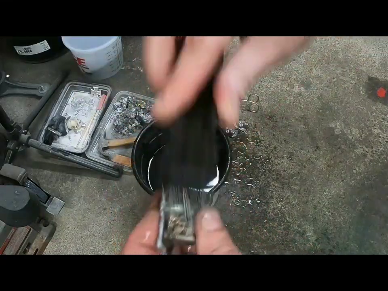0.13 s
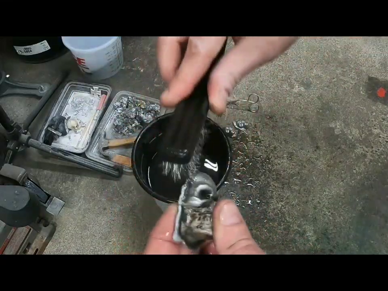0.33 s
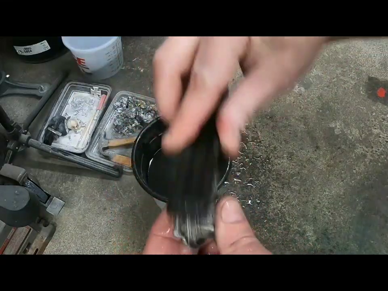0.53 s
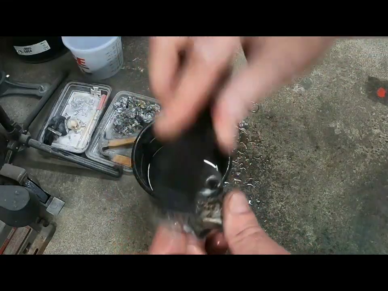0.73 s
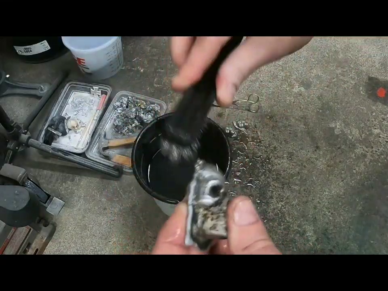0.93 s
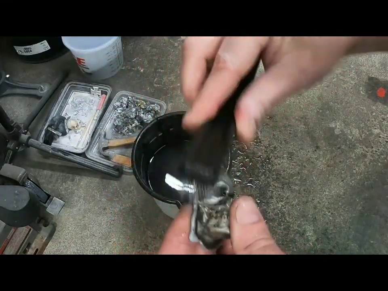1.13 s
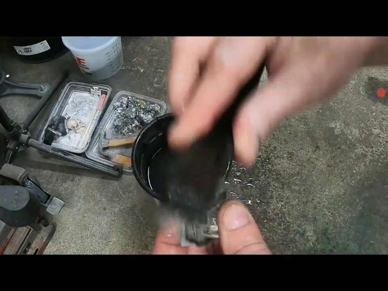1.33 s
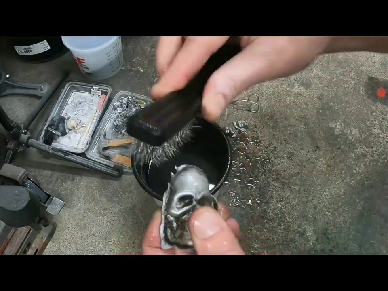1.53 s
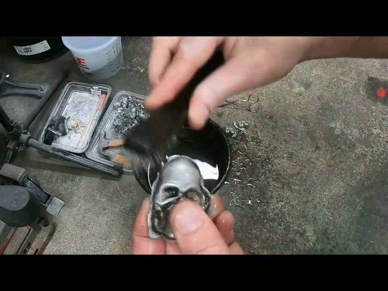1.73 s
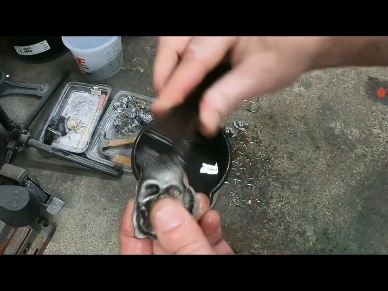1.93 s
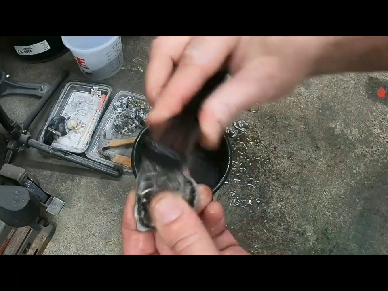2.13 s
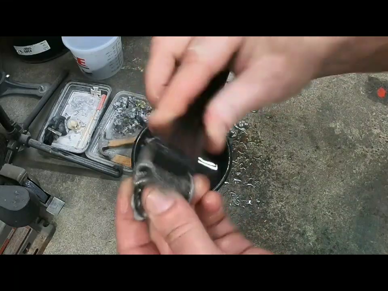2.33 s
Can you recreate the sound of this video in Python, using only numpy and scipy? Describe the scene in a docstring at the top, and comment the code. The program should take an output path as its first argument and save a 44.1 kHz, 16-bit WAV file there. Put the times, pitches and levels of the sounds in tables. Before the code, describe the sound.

A wire brush scrubs a small metal casting close to a stereo microphone. A sharp clack at 0 s, then raspy, bright scrapes near 0.23, 0.52, 0.82, 1.11, 1.39, 1.66, 1.91 and 2.15 s, with light tip touches and snagging ticks; a last touch at 2.37. Low handling thumps and uneven rumble run beneath, with a hollow boom around 2.0 s. Short workshop reverberation, faint air.

```python
"""Wire brush on a casting, close up

A hand wire brush scrubs a small metal casting in a workshop, about four strokes a second, close to the microphone.
After a sharp clack come the strokes: wire tips touch lightly, then countless snapping wires scrape and ring.
Wires, clack and air are filtered noise; handling adds sine thumps and booms over a noise rumble.
A short room tail follows brush and clack, and two microphone ports hear each source differently."""
import sys
import numpy as np
from scipy import signal
from scipy.fft import rfft, irfft, next_fast_len
from scipy.io import wavfile

SR = 44100
rng = np.random.default_rng(int(sys.argv[2]) if len(sys.argv) > 2 else 0)


def store_pcm(level_fs):
    """Save levels as 16-bit WAV."""
    pcm = np.round(np.clip(level_fs, -1, 1) * 32767).astype(np.int16)
    wavfile.write(sys.argv[1], SR, np.atleast_2d(pcm).T)


N = 104825


def amp(db):
    """Decibels to gain."""
    return 10 ** (np.asarray(db) / 20)


def unit(x):
    """Scales to an rms of one."""
    return x / np.sqrt(np.mean(x ** 2) + 1e-20)


def read(points, hz):
    """Reads a table by straight lines on a log-frequency axis."""
    f, value = np.transpose(points)
    return np.interp(np.log(hz + 1), np.log(f + 1), value)


def colour(x, points, size=4096):
    """Minimum-phase filter of unit energy, shaped by a table of relative levels."""
    log_gain = np.log(amp(read(points, abs(np.fft.fftfreq(size, 1 / SR)))))
    taps = np.fft.ifft(np.exp(np.conj(signal.hilbert(log_gain)))).real
    taps = taps / np.linalg.norm(taps)
    return signal.fftconvolve(x, taps[None], axes=1)[:, :N]


def wobble(hz):
    """Random wavering of unit rms, mostly slower than the given rate."""
    gain = 1 / (1 + (np.fft.rfftfreq(N, 1 / SR) / hz) ** 4)
    return unit(irfft(rfft(rng.standard_normal(N)) * gain, N))


def burst(t, fade):
    """Instant attack and exponential fade."""
    return (t >= 0) * np.exp(-np.maximum(t, 0) / fade)


def ports(pair):
    """Blends two versions of a sound into the likeness, level and phase of two microphone ports."""
    # left minus right: f/Hz, level/dB
    balance = [(30, -3.5), (70, -6), (160, -7.5), (330, -10), (500, -6.5), (700, -1.5), (1200, 1),
               (2000, 4), (2500, 7), (3200, -2), (4200, 3), (5600, 5.5), (7200, 7.5), (9800, 4.5),
               (11000, 1), (12300, 40), (15000, -10)]
    # phase by which left leads right: f/Hz, lead/rad
    lead = [(30, -0.28), (220, -0.29), (330, 2.6), (500, 3), (750, 3), (1200, 3), (1700, 5), (2900, 7),
            (4800, 6.5), (5600, 7.5), (9000, 8), (10300, 5.5)]
    # likeness of right to left: f/Hz, likeness (0 to 1)
    likeness = [(30, .99), (70, .98), (160, .5), (230, .6), (380, .9), (650, .9), (1200, .5), (2200, .8),
                (3000, .93), (5500, .95), (7000, .88), (9000, .7), (11000, .15), (15000, .1)]
    size = next_fast_len(N + 8192)
    hz = np.fft.rfftfreq(size, 1 / SR)
    a, b = rfft(pair, size)
    like = np.clip(read(likeness, hz), 0, 1)
    tilt = amp(read(balance, hz) / 2)
    right = (like * a + np.sqrt(1 - like ** 2) * b) * np.exp(-1j * read(lead, hz))
    mean_gain = np.sqrt((tilt ** 2 + tilt ** -2) / 2)
    return irfft(np.array([a * tilt, right / tilt]) / mean_gain, size)[:, :N]


def snaps():
    """Dense clicks of wire tips slipping free, bunched by fast chatter and by whole tufts catching."""
    snaps_per_s, spread_db = 7000, 3.5
    size_db = spread_db * np.minimum(rng.exponential(1, (2, N)), 4)
    size = amp(size_db) * rng.choice([-1, 1], (2, N))
    happens = rng.random((2, N)) < snaps_per_s / SR
    chatter_db = -1.97 * wobble(216)
    tuft_db = 1.1 * wobble(45)
    return unit(size * happens * amp(chatter_db + tuft_db))


def ring(x, count=36):
    """A random handful of wires, as decaying sines, rings on briefly after each snap."""
    t60_s, ring_gain = 0.043, 0.21
    t = np.arange(SR // 10) / SR
    hz = rng.uniform(3591, 12500, (count, 1))
    phase = rng.uniform(0, 2 * np.pi, (count, 1))
    tone = np.sin(2 * np.pi * hz * t + phase).sum(0) * np.exp(-np.log(1000) * t / t60_s)
    rung = signal.fftconvolve(x, tone[None] / np.linalg.norm(tone), axes=1)[:, :N]
    return (x + ring_gain * rung) / np.hypot(1, ring_gain)


def pressure(t, length, rise):
    """The brush bends onto the casting, stays, and slides off."""
    release_s = 0.019
    bend = np.sin(np.pi / 2 * np.clip(t / rise, 0, 1)) ** 2
    return bend * np.exp(-np.maximum(t - length, 0) / release_s)


def taps_of(events, rise_s, fade_s):
    """Sums short contacts, each a linear rise under an exponential fade."""
    t, force = np.arange(N) / SR, np.zeros(N)
    for start, db in events:
        age = t - start
        force += amp(db) * burst(age, fade_s) * np.clip(age / rise_s, 0, 1)
    return force


def brush():
    """Tips touch, the wires hiss and ring, tufts snag, and a rasp builds as the brush presses in."""
    # scrapes, one a faint graze on the way back: t/s, length/s, level/dB, rise/s,
    # level change over the stroke/dB, rasp level/dB, wire pitch ratio
    strokes = [(0.226, 0.15, -41.5, 0.074, -7.5, -50.5, 1.018),
               (0.518, 0.13, -39.5, 0.066, -5.5, -48, 1.022), (0.708, 0.14, -70, 0.03, 5, -87, 0.99),
               (0.82, 0.089, -38, 0.04, -4, -45, 1.023), (1.113, 0.099, -41.5, 0.031, -1.5, -49, 1.046),
               (1.386, 0.11, -38, 0.069, -13, -45.5, .99), (1.664, 0.082, -36.5, 0.047, -15, -43.5, 0.96),
               (1.912, 0.083, -39.5, 0.027, -6, -50, 0.986), (2.148, 0.084, -39, 0.04, -7, -48.5, 0.98)]
    # wire tips touch the casting: t/s, level/dB
    touches = [(0.2329, -42.5), (0.518, -44), (0.8086, -41), (1.108, -42), (1.394, -48), (1.658, -45),
               (1.901, -42.5), (1.911, -40.5), (2.141, -43), (2.367, -42.5)]
    # tufts snag on a ridge and spring free: t/s, level/dB
    snags = [(0.546, -32), (0.563, -30), (0.596, -31), (0.852, -38), (.904, -33), (1.228, -39.5),
             (1.437, -48), (1.492, -35.5), (1.696, -32), (1.704, -32), (1.746, -34), (2.004, -35),
             (2.17, -30.5)]
    # colour of the scraping wires before the pitch ratio: f/Hz, relative level/dB
    wire_colour = [(300, -15.5), (1500, -12), (3250, -15.5), (3550, -9.5), (3900, 0.5), (4400, -2),
                   (4950, -10.5), (5550, 4), (6300, 1.5), (7100, 3), (8300, -4), (10000, -13), (11200, -20),
                   (12300, -20.5), (13200, -25), (15000, -30)]
    # colour of the rasp: f/Hz, relative level/dB
    rasp_colour = [(100, 4), (300, -0.5), (400, 3), (490, 13.5), (570, -1.5), (780, 0), (1100, -11.5),
                   (1450, -12), (1800, -0.5), (2150, 0), (2520, 5), (2850, 0.5), (3050, -3), (3350, -1),
                   (4000, -13), (5000, -5), (8000, 3.5), (11000, -8), (15000, -17)]
    # colour of the tips and snags: f/Hz, relative level/dB
    tip_colour = [(300, -35), (2000, -18), (3300, -20.5), (3900, -9.5), (4400, -4.5), (4900, -11.5),
                  (5600, -3), (7200, -6), (8600, -15.5), (15000, -52)]
    rasp_lag_s = 0.022
    t, grit = np.arange(N) / SR, snaps()
    wires, press = np.zeros((2, N)), np.zeros(N)
    for start, length, db, rise, change_db, rasp_db, tune in strokes:
        age = t - start
        progress = np.clip((age - rise) / (length - rise), 0, 1)
        scrape = grit * pressure(age, length, rise) * amp(db + change_db * progress)
        wires += colour(ring(scrape), np.array(wire_colour) * [tune, 1])
        press += amp(rasp_db) * pressure(age - rasp_lag_s, length - rasp_lag_s, rise)
    touch = taps_of(touches, rise_s=0.0049, fade_s=0.0065)
    snag = taps_of(snags, rise_s=0.0017, fade_s=0.0027)
    rasp = colour(snaps() * press, rasp_colour)
    tips = colour(ring(snaps() * (touch + snag)), tip_colour)
    return ports(wires + rasp + tips)


def clack():
    """Noise bursts for a hard knock with a graze before and a bounce after, damped by the hand."""
    # brush against casting: t/s, level/dB, fade/s
    hits = [(.001, -27.5, 0.0083), (0.0099, -22.5, 0.0018), (0.0146, -38, 0.009)]
    # colour of the knock: f/Hz, relative level/dB
    knock_colour = [(100, -1.5), (450, -13), (700, -4), (850, 2), (1150, -6), (1400, -15.5), (1700, -3),
                    (2500, -4), (3100, -14.5), (3750, -4), (4800, -11), (5900, -3), (7400, -3),
                    (8500, -13.5), (10500, -23), (11500, -39), (15000, -39)]
    t = np.arange(N) / SR
    force = sum(amp(db) * burst(t - start, fade) for start, db, fade in hits)
    return ports(colour(rng.standard_normal((2, N)) * force, knock_colour))


def handling():
    """Soft sine thumps and hollow fading booms in an uneven low rumble of three noise bands."""
    # deep rumble before trim: t/s, level/dB
    deep = [(0, -48), (.3, -53), (.5, -43.5), (.69, -57), (.8, -41.5), (.97, -41), (1.08, -55), (1.4, -54),
            (1.55, -44), (1.85, -49.5), (2.0, -40.5), (2.12, -45), (2.38, -48)]
    # rumble above it before trim: t/s, middle level/dB, upper level/dB
    rumble = [(0.0, -50.5, -55.5), (0.21, -54, -68), (0.24, -47.5, -63), (0.48, -54, -68),
              (0.52, -51, -53.5), (0.67, -54, -58.5), (0.79, -41, -43.5), (0.99, -47, -50),
              (1.02, -52, -54.5), (1.21, -52.5, -51), (1.3, -53, -68), (1.5, -49, -53.5),
              (1.53, -47.5, -64), (1.57, -54, -56), (1.63, -42, -58), (1.71, -50, -50.5), (1.9, -60, -54.5),
              (1.95, -53.5, -49.5), (2.0, -39, -54), (2.04, -36.5, -59), (2.13, -49.5, -58.5),
              (2.22, -56, -48), (2.29, -51.5, -73), (2.38, -47.5, -65)]
    # colours of the deep, middle and upper rumble, each: f/Hz, relative level/dB
    rumble_colours = [
        [(8, -50.5), (26, 5.5), (42, -5.5), (62, 2), (95, -9), (160, -23.5), (600, -72.5)],
        [(50, -25), (110, -0.5), (165, -1), (185, -0.5), (207, -0.5), (240, -13), (330, -43), (900, -52)],
        [(150, -26.5), (270, 4), (320, -1), (375, -2.5), (500, -14.5), (580, -19.5), (800, -13.5), (1100, -26),
         (4000, -48)],
    ]
    # trim of the deep, middle and upper rumble: level/dB
    trims = [0, 1, 1.5]
    # handling thumps: t/s, length/s, f/Hz, level/dB
    thumps = [(0.184, 0.092, 33, -42.5), (0.348, 0.1, 58, -33.5), (0.514, 0.2, 42.07, -46),
              (0.8, 0.15, 32.96, -42), (1.081, 0.2, 30.07, -36.5), (1.26, .09, 35, -42.5),
              (1.46, 0.12, 59.9, -41.5), (1.648, 0.17, 38, -38.5), (1.885, 0.052, 46, -34.5),
              (1.98, 0.13, 52, -33), (2.209, 0.062, 35.3, -40.5)]
    # hollow booms ringing in the rumble: t/s, f/Hz, level/dB, fade/s
    booms = [(0.759, 165, -47.5, 0.24), (1.621, 164, -49.5, 0.3), (2.0, 205, -37.5, 0.15),
             (2.1, 178, -38.5, 0.066)]
    boom_rise_s = 0.043
    t, out = np.arange(N) / SR, np.zeros((2, N))
    times, middle, upper = np.transpose(rumble)
    levels = np.interp(t, *np.transpose(deep)), np.interp(t, times, middle), np.interp(t, times, upper)
    for level, shape, trim_db in zip(levels, rumble_colours, trims):
        out += unit(colour(rng.standard_normal((2, N)), shape)) * amp(level + trim_db)
    for start, length, hz, db in thumps:
        swell = np.sin(np.pi * np.clip((t - start) / length, 0, 1)) ** 2
        tone = np.sin(2 * np.pi * (hz * t + rng.random()))
        out[0] += amp(db) * np.sqrt(2) * swell * tone
    for start, hz, db, fade in booms:
        age = t - start
        swell = np.clip(age / boom_rise_s, 0, 1) * burst(age, fade)
        out += amp(db) * swell * np.sin(2 * np.pi * (hz * t + rng.random()))
    return ports(out)


def room(x, count=3):
    """A diffuse noise tail, longest in the upper middle; its fine pattern shifts as random tails take turns."""
    # decay by 60 dB: f/Hz, t60/s
    decay = [(100, 0.1), (1000, 0.24), (2500, 0.45), (6000, 0.32), (10000, 0.25), (15000, 0.18)]
    level_db, build_s, half_turns_per_s = -12.5, 0.0075, 1.443
    out, turn = np.zeros((2, N)), np.arange(N) / SR * half_turns_per_s
    for k in range(count):
        hz, t, z = signal.stft(rng.standard_normal((2, SR // 2)), SR, nperseg=256)
        fade = np.exp(-np.log(1000) * t / read(decay, hz)[:, None])
        build = np.minimum(t / build_s, 1)
        tail = signal.istft(z * fade * build, SR, nperseg=256)[1]
        # taking turns keeps one tail's fixed pattern from standing out
        share = np.cos(np.pi * (turn + k / count)) * np.sqrt(2 / count)
        out += signal.fftconvolve(x * share, tail / np.linalg.norm(tail[0]), axes=1)[:, :N]
    return amp(level_db) * out


def workshop_air():
    """Steady noise, strongest in the bass, for the quiet air of the workshop."""
    # colour of the air: f/Hz, relative level/dB
    air_colour = [(30, 0), (200, -6), (400, -18), (560, -24), (780, -18), (1100, -29), (1600, -32),
                  (2500, -33), (3500, -37), (5500, -34), (10000, -38), (15000, -47)]
    return amp(-57) * colour(rng.standard_normal((2, N)), air_colour)


def scene():
    """Brush and clack with their room tail, then handling, over the workshop air."""
    scrub, knock = brush(), clack()
    tail = room(scrub + amp(-1) * knock)
    return scrub + knock + tail + handling() + workshop_air()


def record(dry):
    """The band limit of the recorder, a steep linear-phase low-pass."""
    edge_hz = 15350
    low_pass = signal.firwin(511, edge_hz, window=("kaiser", 9), fs=SR)
    return signal.oaconvolve(dry, low_pass[None], "same")


dry = scene()
out = record(dry)
store_pcm(out)
```